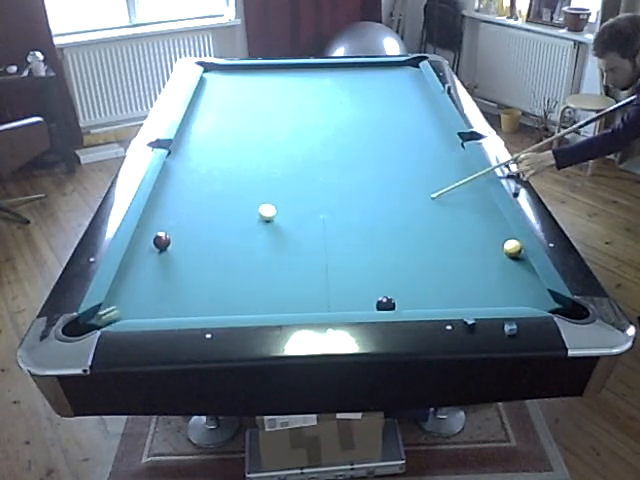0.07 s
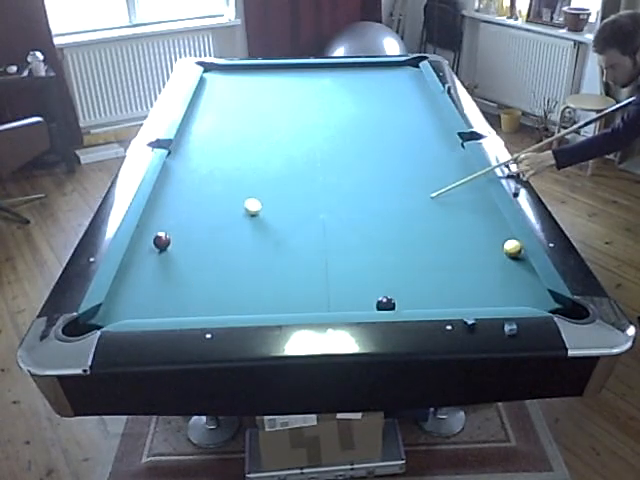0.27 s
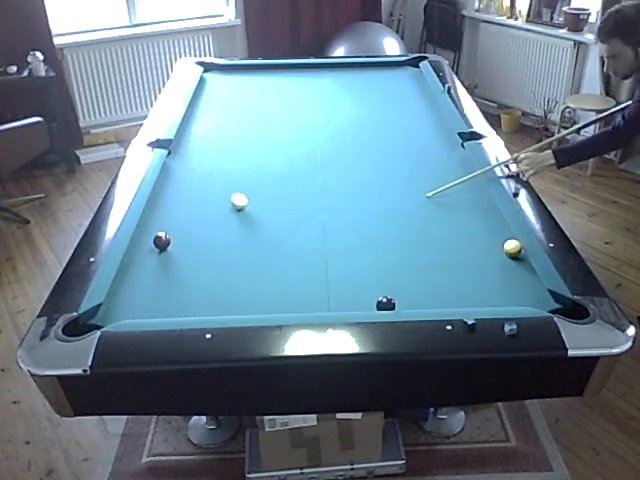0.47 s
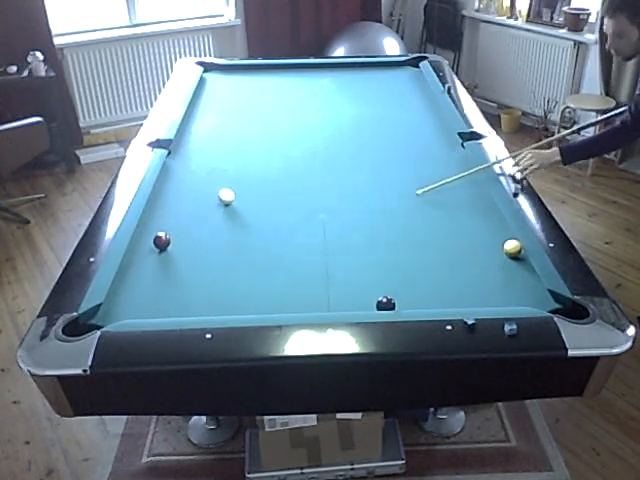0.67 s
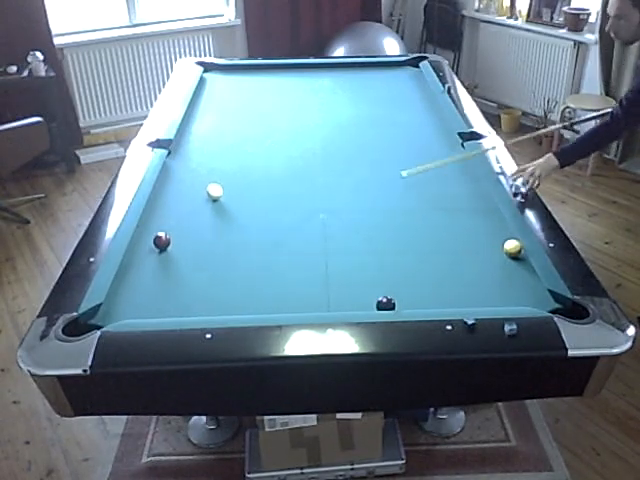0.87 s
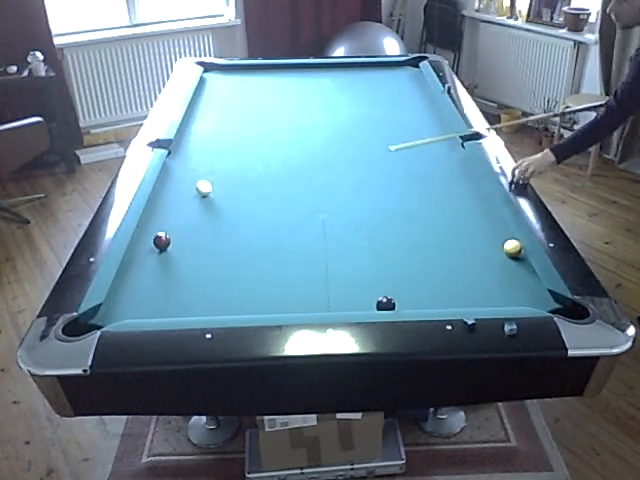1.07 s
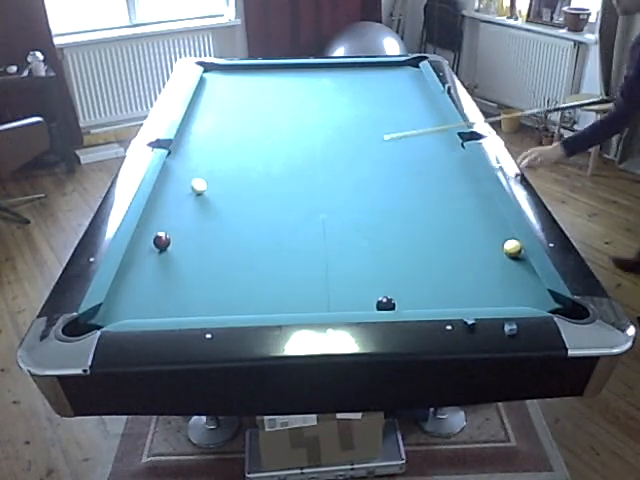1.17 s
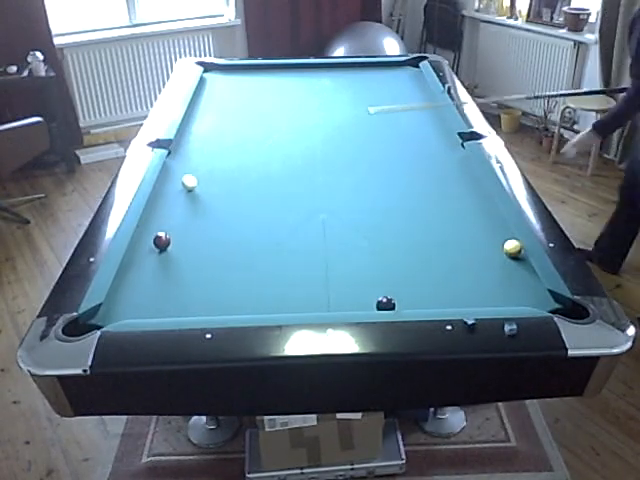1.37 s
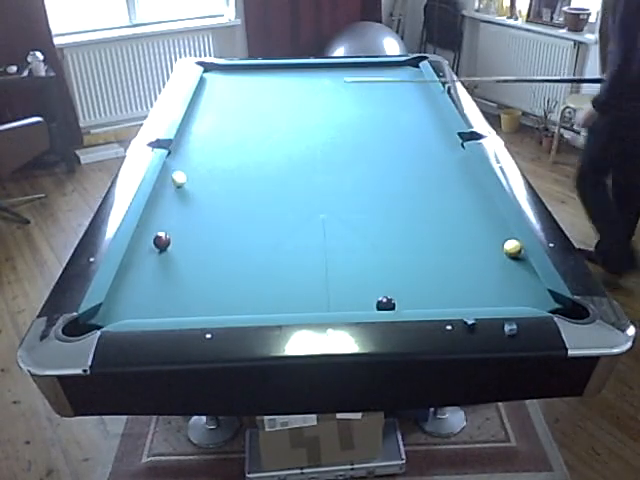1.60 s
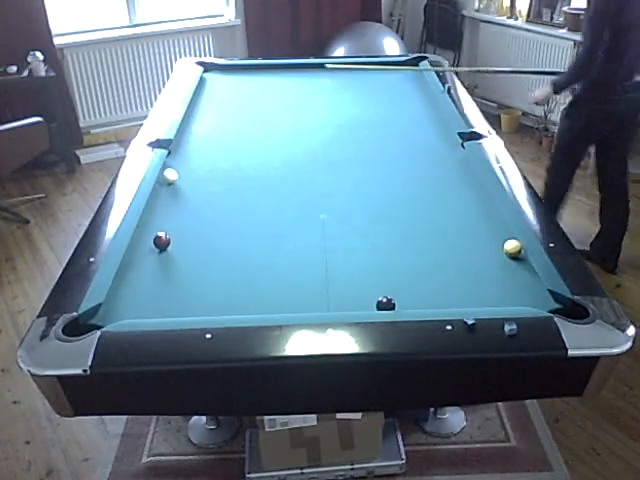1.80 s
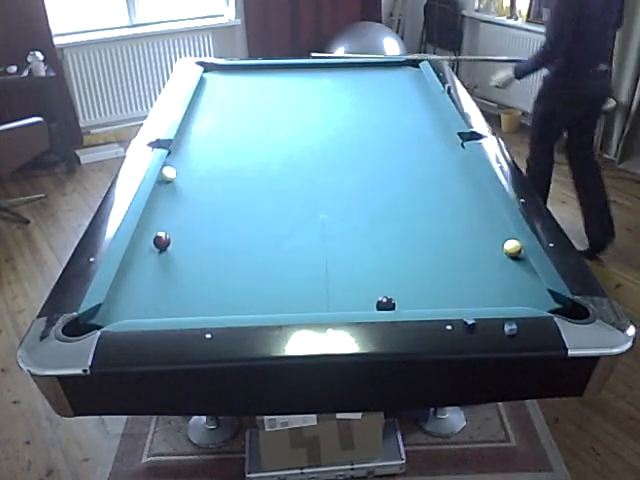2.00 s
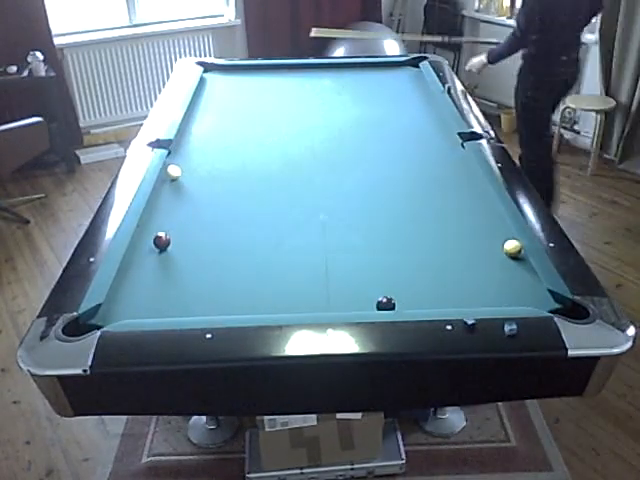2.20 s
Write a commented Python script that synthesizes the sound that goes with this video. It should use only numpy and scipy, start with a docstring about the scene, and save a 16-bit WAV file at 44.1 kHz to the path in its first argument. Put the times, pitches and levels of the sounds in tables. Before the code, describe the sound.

A billiard ball drops into a pocket with a hollow clatter and rolls away, knocking softly.

```python
"""A live room with a wooden floor still rings from a pool shot. At 0.24 s the ball slams into a corner
pocket, then drops into the hollow return and rattles; the blows excite wood modes and room reverb.
From 0.86 s it knocks and rolls down the channel. Near 1.9 s the player steps back with a rustle.
Faint hiss and deep rumble run throughout; a narrow-band recorder adds grit and cuts the top."""
import sys
import numpy as np
from scipy import signal
from scipy.fft import rfft, irfft
from scipy.io import wavfile

SR = 44100
rng = np.random.default_rng(int(sys.argv[2]) if len(sys.argv) > 2 else 0)


def transcribe(signal):
    """Save signal, clipped to [-1, 1], as a 16-bit WAV file at the path in sys.argv[1]."""
    frames = np.atleast_2d(signal).T
    limited = np.clip(frames, -1, 1)
    pcm = np.round(limited * 32767).astype(np.int16)
    wavfile.write(sys.argv[1], SR, pcm)


N = 99225

# ball on the back of the pocket: start_s, level_db, ring_db
POCKET_BLOWS = [(0.2377, -23.5, -37.5), (0.2700, -35, -36.5)]
# pocket modes: pitch_hz, level_db, t60_s
POCKET_RESONANCES = [(536, -0.5, 0.61), (591.5, 1, 0.87), (660, -12.5, .6), (697, -9, 0.36),
                     (788, -1.5, 0.73), (843, -2, 0.77), (889.3, 6.5, 0.33), (1103, 2, 1), (1159, 0.5, .5),
                     (1340, -12, 0.27), (1437, -7.5, .5), (1472, -3.5, 0.58)]
# pocket blow: freq_hz, level_db
POCKET_SPECTRUM = [(50, -41.5), (130, -20.5), (270, -10), (400, -9), (580, 9.5), (900, -1), (1400, -1),
                   (1850, -22), (3400, -18.5), (4100, -32), (7000, -27.5)]

# bounces in the return: start_s, level_db, ring_db, tilt_db_per_oct
RETURN_BOUNCES = [(0.3160, -29.5, -39, 0.5), (0.3237, -28.5, -21.5, -1), (0.3470, -39, -40.5, 2.5),
                  (0.3606, -35, -36, -6.5), (0.3790, -37, -35.5, 1.5), (0.3960, -38.5, -27, -4),
                  (0.416, -43.5, -31, 2.5), (0.4350, -47, -35.5, -7), (0.4690, -40.5, -39.5, 1.5),
                  (0.557, -46, -59, -1), (0.6120, -49, -58.5, -6), (0.691, -65, -61.5, -12)]
# return modes: pitch_hz, level_db, t60_s
RETURN_RESONANCES = [(373.2, -16, .5), (464.4, -17, 0.71), (514.2, 0.5, 0.26), (536.1, -1.5, 0.31),
                     (608, -22.5, 0.26), (1135, -17.5, .4), (1195, -5.5, 0.38), (1267, -20, 0.36),
                     (1664, -25, .4), (1802, -17.5, 0.13), (1964, -22.5, .4)]
# return bounce: freq_hz, level_db
RETURN_SPECTRUM = [(50, -17.5), (130, -18), (270, -7), (500, 6), (750, 0), (1200, 3.5), (1500, -3.5),
                   (2100, -21.5), (3300, -22.5), (4000, -37.5), (7000, -43.5)]
# hard contacts in the return: start_s, level_db, tilt_db_per_oct
RETURN_CLACKS = [(0.315, -38, -3), (0.3209, -37.5, -0.5), (0.34, -43.5, 4.5), (0.3490, -43, -11),
                 (0.3800, -46, 2), (0.447, -48, -4.5), (0.468, -45, -5)]
# hard contact: freq_hz, level_db
CLACK_SPECTRUM = [(200, -29.5), (1000, -26.5), (1500, 1), (2000, 1), (2600, -6), (3300, -5), (3900, -16.5),
                  (7000, -24)]

# knocks along the channel: start_s, level_db, ring_db, tilt_db_per_oct
CHANNEL_KNOCKS = [(0.8649, -43, -51, -4), (0.8712, -40.5, -35.5, 3.5), (0.9010, -45, -40.5, -1),
                  (0.9246, -50, -34, 1.5), (0.9660, -57.5, -42, -3.5), (1.1360, -52, -53.5, -9.5),
                  (1.1640, -49, -55, -3.5), (1.1870, -55.5, -45.5, -7), (1.2130, -54.5, -51.5, -6),
                  (1.2570, -64, -52, -3), (1.29, -69, -70.5, 4)]
# channel modes: pitch_hz, level_db, t60_s
CHANNEL_RESONANCES = [(366, -14.5, .45), (414, -23, 0.8), (469, -9.5, 0.34), (512, -2, 0.31), (542, 2, 0.2),
                      (657.5, -10, 0.24), (1115, -11, 0.67), (1191, -3, 0.38), (1230, -19.5, 0.2),
                      (1525, -17, 0.5)]
# channel knock and roll: freq_hz, level_db
CHANNEL_SPECTRUM = [(50, -21.5), (130, -14.5), (250, -20.5), (360, 2), (750, 2.5), (950, 0.5), (1150, 3.5),
                    (1500, -3.5), (2000, -13.5), (3000, -22.5), (4000, -28), (7000, -37)]
# ball meets a bend: start_s, level_db
BEND_KNOCKS = [(1.0550, -41)]
# bend knock: freq_hz, level_db
BEND_SPECTRUM = [(60, -9), (160, -4), (250, -17), (350, 1), (520, -6), (760, 5.5), (970, -9), (1140, 3.5),
                 (1280, -6.5), (1480, -2), (1750, -16), (2200, -19.5), (3000, -30.5), (4000, -33.5),
                 (7000, -37.5)]

# table takes the ball's weight: start_s, level_db, ring_db
TABLE_THUMPS = [(0.251, -42, -49.5), (0.321, -44.5, -38), (0.363, -45, -37), (0.394, -49.5, -38.5),
                (0.750, -67, -49.5), (0.903, -64, -41.5), (0.94, -59.5, -43), (1.129, -57.5, -56.5)]
# table modes: pitch_hz, level_db, t60_s
TABLE_RESONANCES = [(67.3, -14, 0.55), (105.6, -5, 0.31), (125, 4.5, 0.076), (164, -12, .1)]
# table thump: freq_hz, level_db
THUMP_SPECTRUM = [(25, -37), (45, -26), (65, -2.5), (85, -12), (105, 0), (130, 0), (190, -4.5), (300, -20),
                  (800, -41.5)]
# dry ticks: start_s, relative_db
DRY_TICKS = [(0.2500, -30), (0.3955, -32.5), (0.5415, -50.5), (0.5830, -55), (0.9770, -50)]
# tick and recorder grit: freq_hz, level_db
TICK_SPECTRUM = [(500, -22), (2500, 8), (4000, 5), (7000, 3)]

# foot contacts: start_s, level_db
FOOTFALLS = [(1.985, -57.5), (2.054, -66)]
# foot on boards: freq_hz, level_db
FOOT_SPECTRUM = [(30, -4.5), (65, 2), (110, 1), (220, -2), (400, -13.5), (1200, -14.5), (2500, -41),
                 (7000, -52)]
# clothes rustle: freq_hz, level_db
RUSTLE_SPECTRUM = [(100, -13.5), (600, -6.5), (1100, -5), (1500, -1.5), (2200, -19), (5000, -24.5)]
# echo of the shot: freq_hz, level_db
SHOT_SPECTRUM = [(30, -3), (65, 1.5), (120, 2.5), (300, -2.5), (550, -15.5), (1100, -7), (1550, -2),
                 (2100, -9), (3300, -14), (4200, -28), (7000, -50)]
# background hiss: freq_hz, level_db
HISS_SPECTRUM = [(20, -11), (32, -1), (48, -9), (65, -2), (85, -8.5), (105, -5.5), (160, -12), (300, -17),
                 (800, -20), (1300, -20), (1900, -26), (4000, -28.5), (7000, -31)]
# rumble envelope: time_s, level_db
RUMBLE_LEVELS = [(0, -68.5), (.95, -62), (1.081, -50), (1.5, -56), (1.95, -55.5), (2.131, -36.5),
                 (2.25, -43)]
# rumble: freq_hz, level_db
RUMBLE_SPECTRUM = [(5, 1.5), (10, 1), (18, -11), (30, -31), (60, -63), (400, -100)]
# room decay: freq_hz, t60_s
ROOM_DECAY = [(60, 1.1), (250, 0.89), (500, 0.73), (1000, 0.49), (2000, 0.53), (4000, 0.42), (8000, 0.67)]

TOP_HZ = 7000
ROOM_BUILD_S = 0.0017


def pocket():
    """Ball strikes the pocket and rings its modes."""
    out = np.zeros(N)
    for start_s, level_db, ring_db in POCKET_BLOWS:
        add(out, start_s, knock(POCKET_SPECTRUM, level_db))
        add(out, start_s, ring(POCKET_RESONANCES, ring_db))
    return out


def ball_return():
    """Ball bounces and clacks in the ringing hollow."""
    out = np.zeros(N)
    for start_s, level_db, ring_db, tilt_db_per_oct in RETURN_BOUNCES:
        add(out, start_s, knock(RETURN_SPECTRUM, level_db, tilt_db_per_oct))
        add(out, start_s, ring(RETURN_RESONANCES, ring_db))
    for start_s, level_db, tilt_db_per_oct in RETURN_CLACKS:
        add(out, start_s, clack(level_db, tilt_db_per_oct))
    return out


def clack(level_db, tilt_db_per_oct, boost_db=3, boost_s=0.0043):
    """Hard contact: the attack stands out of the reverb."""
    x = knock(CLACK_SPECTRUM, level_db, tilt_db_per_oct)
    return x * (1 + undb(boost_db) * np.exp(-times(len(x)) / boost_s))


def channel(roll_db=-56, ring_tilt_ratio=1.26, pivot_hz=510):
    """Ball rolls down the channel, knocking on its walls and at a bend."""
    roll = swell(centre_s=1.09, width_s=0.073)
    out = undb(roll_db) * colour(roll, CHANNEL_SPECTRUM, tilt_db_per_oct=-3)
    for start_s, level_db, ring_db, tilt_db_per_oct in CHANNEL_KNOCKS:
        # duller knocks excite the high modes less
        modes = [(hz, db + ring_tilt_ratio * tilt_db_per_oct * np.log2(hz / pivot_hz), t60_s)
                 for hz, db, t60_s in CHANNEL_RESONANCES]
        add(out, start_s, knock(CHANNEL_SPECTRUM, level_db, tilt_db_per_oct))
        add(out, start_s, ring(modes, ring_db))
    for start_s, level_db in BEND_KNOCKS:
        add(out, start_s, knock(BEND_SPECTRUM, level_db))
    return out


def table_body():
    """Low booms as the table takes the ball's weight."""
    out = np.zeros(N)
    for start_s, level_db, ring_db in TABLE_THUMPS:
        boom = knock(THUMP_SPECTRUM, level_db) + ring(TABLE_RESONANCES, ring_db)
        add(out, start_s, soften(boom, build_s=0.004))
    return out


def ticks():
    """Bright, dry impulses on top of the rattle."""
    impulses = np.zeros(N)
    for start_s, relative_db in DRY_TICKS:
        add(impulses, start_s, undb([relative_db]))
    return colour(impulses, TICK_SPECTRUM) * SR / TOP_HZ


def player(rustle_db=-69.5):
    """Clothes rustle; a foot lands softly on the boards."""
    out = undb(rustle_db) * colour(swell(centre_s=1.91, width_s=0.081), RUSTLE_SPECTRUM)
    for start_s, level_db in FOOTFALLS:
        add(out, start_s, soften(knock(FOOT_SPECTRUM, level_db), build_s=0.015))
    return out


def background(hiss_db=-65, shot_db=-53.5, shot_age_s=0.028):
    """Deep rumble, faint hiss and the tail of the shot's echo."""
    rumble_db = np.interp(times(N), *np.array(RUMBLE_LEVELS).T)
    rumble = undb(rumble_db) * colour(rng.standard_normal(N), RUMBLE_SPECTRUM)
    hiss = undb(hiss_db) * colour(rng.standard_normal(N), HISS_SPECTRUM)
    out = rumble + hiss
    add(out, 0, knock(SHOT_SPECTRUM, shot_db)[int(shot_age_s * SR):])
    return out


def knock(spectrum, level_db, tilt_db_per_oct=0, click_db=12.5, shudder_db=1.5, shudder_s=0.012):
    """One contact: direct click, short shudder of the wood, room reverb."""
    reverb = room()
    shudder = undb(shudder_db) * rng.standard_normal(SR) * np.exp(-times(SR) / shudder_s)
    x = reverb + soften(shudder, ROOM_BUILD_S)
    x[0] += undb(click_db)
    return undb(level_db) * colour(x, spectrum, tilt_db_per_oct)


def ring(modes, level_db, build_s=0.0049, boost_db=-0.5, boost_s=0.011):
    """Damped modes: swell as the room fills, drop quickly, then linger as reverb."""
    t = times(SR)
    x = sum(undb(db) * np.sin(2 * np.pi * hz * t) * decay(t, t60_s) for hz, db, t60_s in modes)
    early_boost = 1 + undb(boost_db) * np.exp(-t / boost_s)
    return undb(level_db) * soften(x, build_s) * early_boost


def room():
    """Diffuse reflections: build up, then each octave dies at its own rate."""
    t, bins_hz = times(SR), np.arange(SR // 2 + 1)
    noise = rfft(rng.standard_normal(SR))
    octaves_hz = 62.5 * 2 ** np.arange(8)
    out = np.zeros(SR)
    for centre_hz, weights in zip(octaves_hz, np.eye(len(octaves_hz))):
        band_gain = on_log(bins_hz, np.column_stack([octaves_hz, weights]))
        out += irfft(noise * band_gain) * decay(t, on_log(centre_hz, ROOM_DECAY))
    return soften(out, ROOM_BUILD_S)


def swell(centre_s, width_s):
    """Noise under a Gaussian envelope."""
    return rng.standard_normal(N) * np.exp(-((times(N) - centre_s) / width_s) ** 2 / 2)


def colour(x, spectrum, tilt_db_per_oct=0, size=16384):
    """Minimum-phase, unit-energy filter with a tilted spectrum."""
    hz = np.arange(size // 2 + 1) * SR / size
    gain_db = on_log(hz, spectrum) + tilt_db_per_oct * np.log2(np.clip(hz, 200, TOP_HZ))
    cepstrum = irfft(np.log(undb(gain_db)))
    cepstrum[1:size // 2] *= 2
    cepstrum[size // 2 + 1:] = 0
    response = irfft(np.exp(rfft(cepstrum)))
    return signal.fftconvolve(x, response / np.linalg.norm(response))[:len(x)]


def soften(x, build_s):
    """Rounds the attack."""
    return x * (1 - np.exp(-times(len(x)) / build_s))


def decay(t, t60_s):
    return np.exp(-np.log(1000) * t / t60_s)


def on_log(hz, points):
    """Interpolates over log frequency."""
    points_hz, values = np.array(points, float).T
    return np.interp(np.log(np.maximum(hz, 1)), np.log(points_hz), values)


def add(out, start_s, x):
    """Mixes x into out."""
    i = int(start_s * SR)
    out[i:i + len(x)] += x[:len(out) - i]


def times(samples):
    return np.arange(samples) / SR


def undb(db):
    return 10 ** (np.asarray(db) / 20)


def scene():
    """All sources at one microphone."""
    return (pocket() + ball_return() + channel() + table_body() + ticks() + player() + background())[None]


def record(dry, grit_db=-31, grit_highpass_hz=200):
    """Narrow-band recorder: grit that follows the sound, then a steep low-pass."""
    highpass = signal.butter(2, grit_highpass_hz, "high", fs=SR, output="sos")
    lowpass = signal.butter(30, TOP_HZ, fs=SR, output="sos")
    drive = signal.sosfilt(highpass, dry[0])
    grit = undb(grit_db) * colour(drive * rng.standard_normal(N), TICK_SPECTRUM)
    return signal.sosfilt(lowpass, dry + grit)


dry = scene()
out = record(dry)
transcribe(out)
```